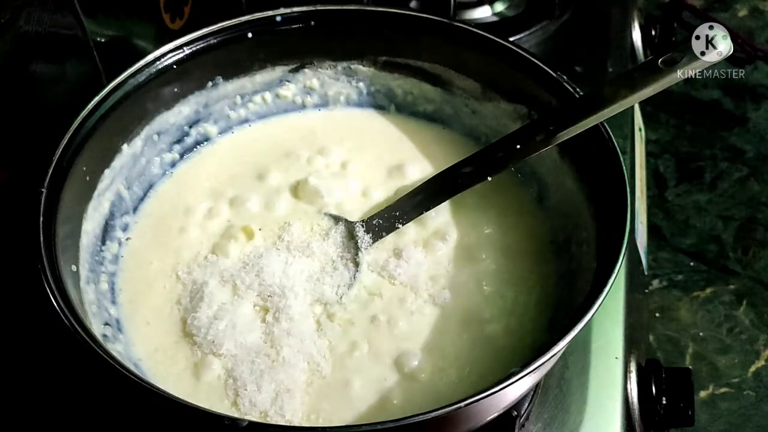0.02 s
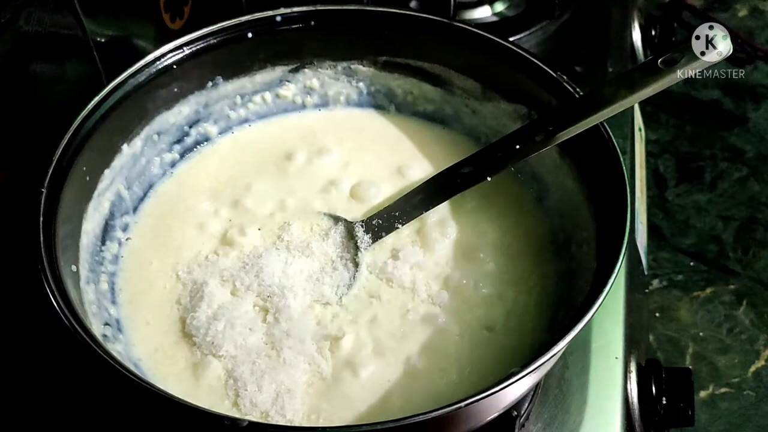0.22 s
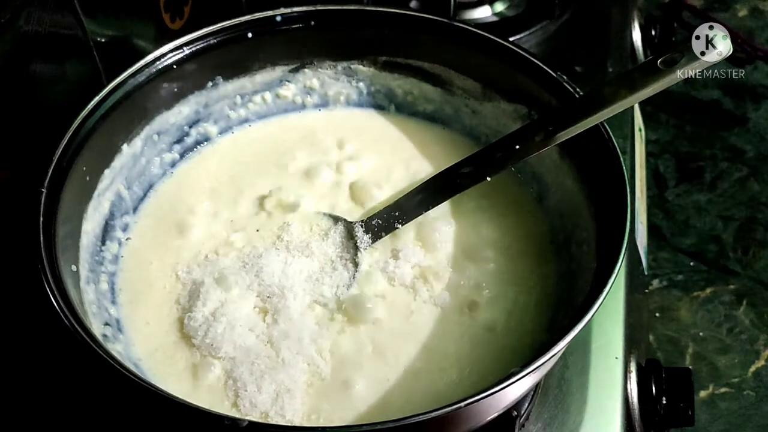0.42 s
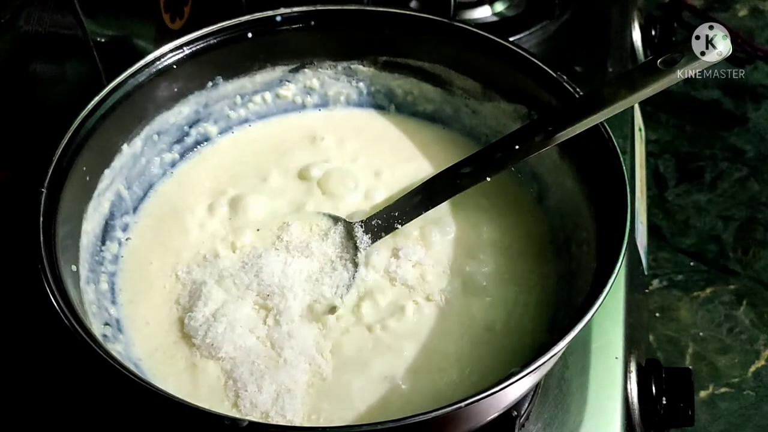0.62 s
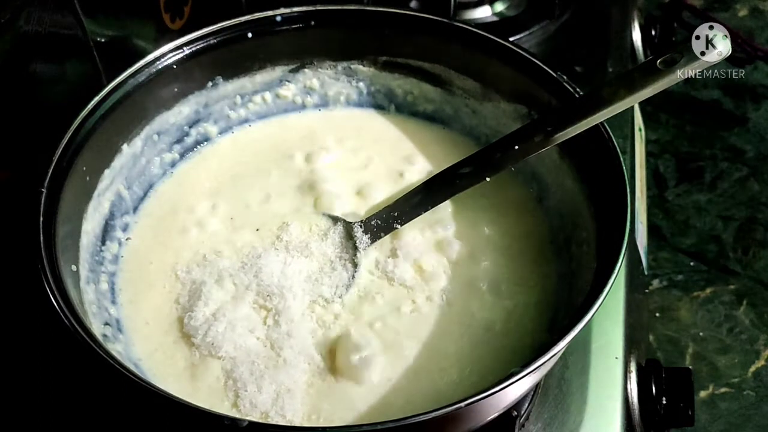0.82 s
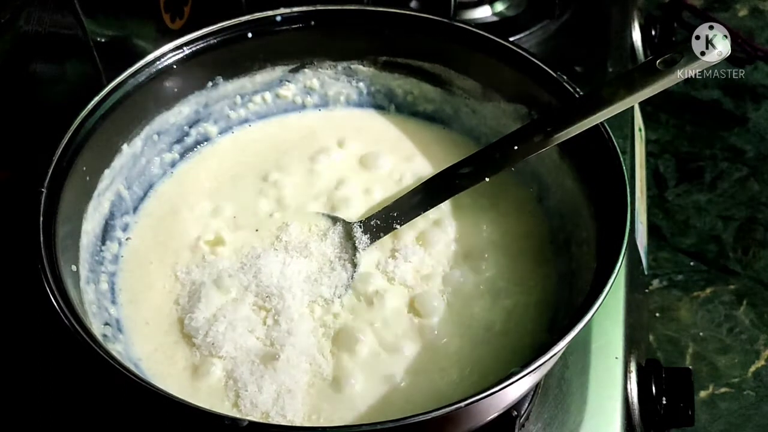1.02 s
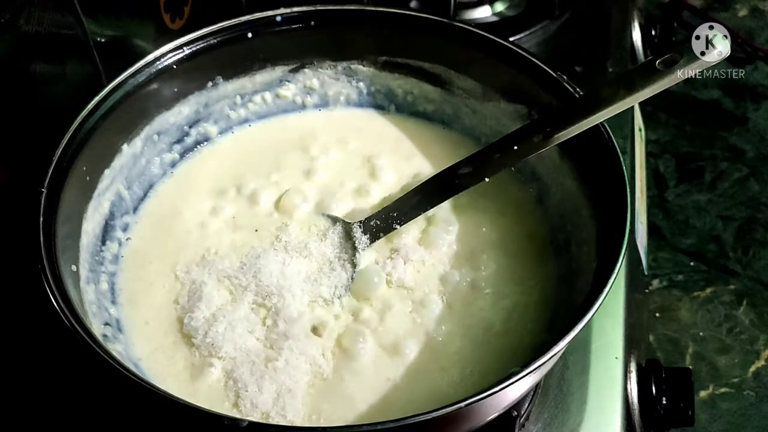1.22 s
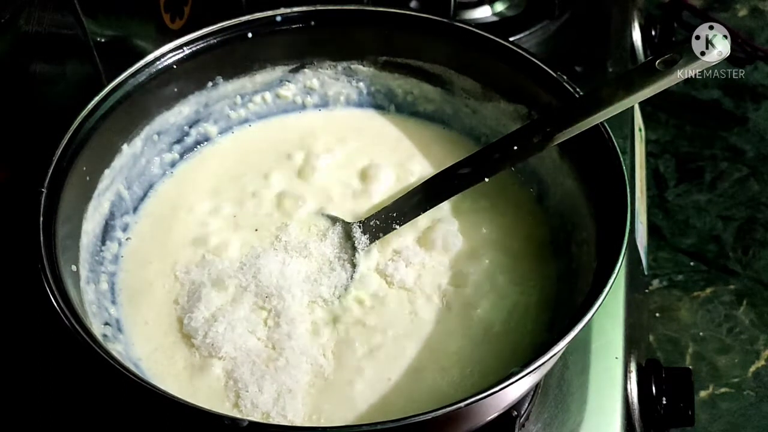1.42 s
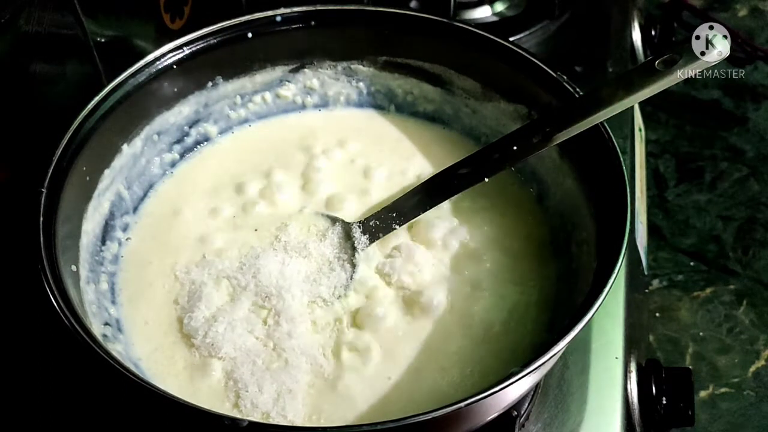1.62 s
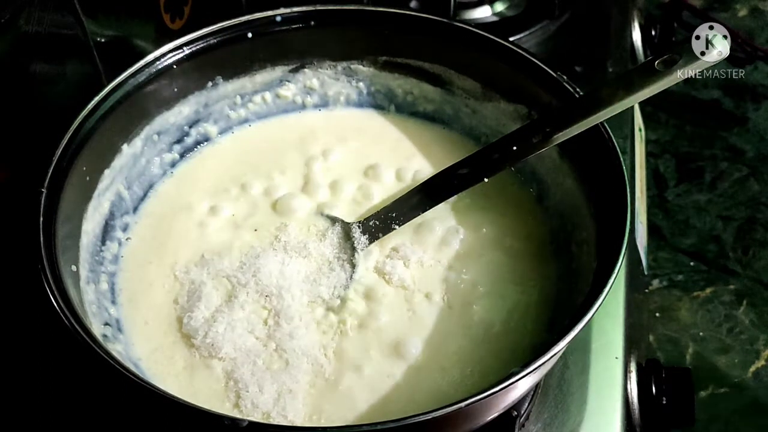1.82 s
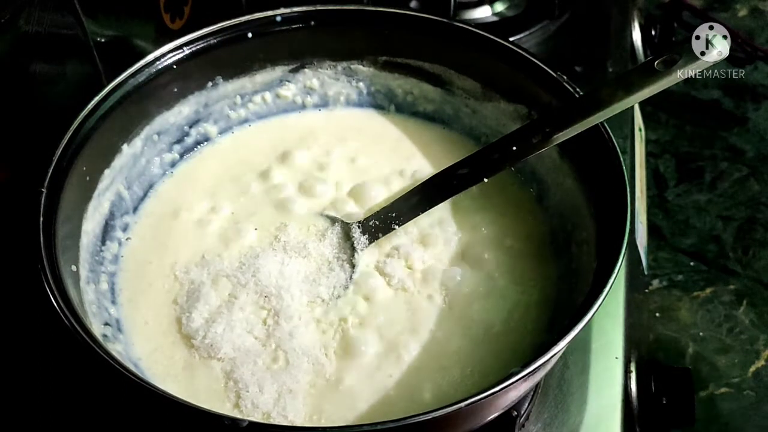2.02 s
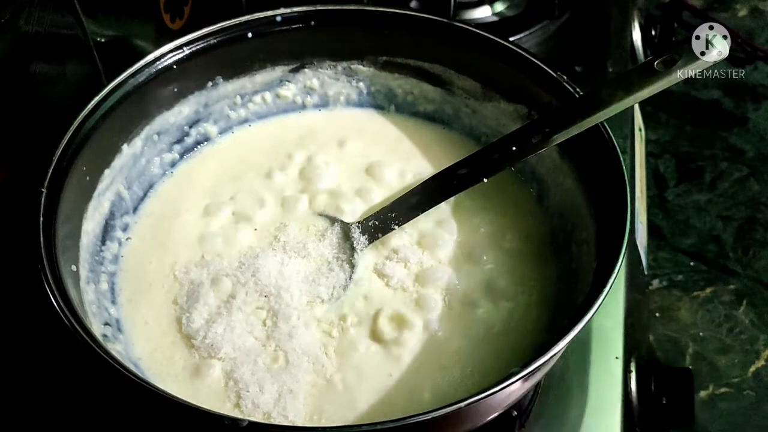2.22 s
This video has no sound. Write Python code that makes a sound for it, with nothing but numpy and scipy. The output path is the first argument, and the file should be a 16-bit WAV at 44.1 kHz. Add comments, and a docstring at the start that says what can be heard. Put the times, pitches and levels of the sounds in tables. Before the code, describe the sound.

Thick milk and grain simmering in a steel pan, bubbles popping softly, one sharp metallic tap early

```python
"""A low stove noise and a bed of small bubbles, heard close on two microphones in a hard-walled kitchen.
Thick milk and grain simmer in a steel pan: collapsing steam pockets ring its modes, bubbles pop as
short rising sines, droplets spit as noise bursts. Once something hard is tapped further off: decaying
modes with reflections, then lingering tones and a noise tail as the room answers.
Stove, burner and hiss are shaped noise; feedback delays are the kitchen around the pan."""
import sys
import numpy as np
from scipy import signal
from scipy.io import wavfile

SR = 44100
rng = np.random.default_rng(int(sys.argv[2]) if len(sys.argv) > 2 else 0)


def int16_out(signal):
    """Quantize to a 16-bit WAV file."""
    q = np.round(np.clip(np.atleast_2d(signal).T, -1, 1) * 32767)
    wavfile.write(sys.argv[1], SR, q.astype(np.int16))


N = 101429

# stove noise spectrum, relative: [f/Hz, level/dB per Hz]
STOVE_SPECTRUM = [(25, 4.5), (40, -14), (62, -15), (130, -16.5), (200, -6.5), (420, -16), (1000, -17.5),
                  (2500, -25.5), (4000, -27.5), (6000, -38.5), (8000, -28), (12000, -50.5), (14500, -28)]
# movement of the treble hiss, used about its mean: [t/s, level/dB]
HISS_LEVEL = [(0.0, -81), (0.26, -82), (0.38, -77.5), (0.66, -80.5), (1.07, -79.5), (1.77, -80.5),
              (1.94, -75.5), (2.3, -78)]
# left-right likeness of the stove noise at the microphones: [f/Hz, likeness 0-1]
STOVE_LIKENESS = [(30, 0.37), (150, 0.78), (260, 1), (500, 0.32), (2000, 0), (8000, 0.24)]
# deep rumble: [t/s, level/dB rms]
RUMBLE_LEVEL = [(0.0, -59.5), (0.09, -51.5), (0.14, -59), (0.22, -51.5), (0.47, -52), (0.5, -63),
                (0.58, -38), (0.68, -61), (0.77, -43.5), (0.88, -61), (0.91, -53.5), (1.45, -60.5),
                (2.18, -56), (2.3, -57)]
# low drones of the stove: [f/Hz, width/Hz, level/dB rms]
STOVE_DRONES = [(102.5, 13, -64), (144.6, 3.2, -71), (204.5, 14.6, -63)]
# vigour of the simmer, before the trims of bubbles and knocks: [t/s, level/dB]
SIMMER_LEVEL = [(0.0, -55.5), (0.14, -59), (0.32, -50), (0.46, -52), (0.69, -55.5), (0.99, -53),
                (1.34, -57), (2.1, -52), (2.3, -59)]
# steam pockets collapsing on the bottom: [t/s, strike level/dB, strength of the upper modes/dB]
COLLAPSES = [(0.067, -47.5, 5), (0.164, -39.5, -1), (0.27, -52, 12), (0.46, -46.5, 0), (0.556, -52, -2),
             (0.625, -58, 12.5), (0.647, -46.5, 1.5), (0.685, -48, -12.5), (0.758, -47.5, 3.5),
             (0.812, -43, -9.5), (0.875, -41, -7), (0.972, -42, -8), (1.035, -47, -4), (1.075, -45.5, 3.5),
             (1.125, -44.5, -1), (1.198, -48, 1.5), (1.313, -47, 3), (1.403, -43.5, -7),
             (1.619, -44.5, 0.5), (1.661, -58, -5), (1.769, -45, -15), (1.912, -49, -10),
             (2.028, -53.5, -9), (2.093, -46.5, -7), (2.124, -44.5, 0), (2.249, -50, -6.5)]
# modes of the full pan: [f/Hz, level/dB, t60/s]
PAN_MODES = [(207.4, -2, 0.14), (267.5, -8, 0.099), (377.6, -4.5, 0.087), (470.3, -7.5, 0.086),
             (605.3, -6, 0.12), (746, -8.5, 0.083), (830, -9.5, 0.11), (1162, -6, 0.12),
             (1320, -13.5, 0.12), (1750, -12, 0.085)]
# bubbles popping at the surface, knock and splash relative to the pop:
# [t/s, peak level/dB, starting f/Hz, knock on the pan/dB, left minus right/dB, splash/dB]
SURFACE_POPS = [(0.068, -61, 1253, -18, -4, -25), (0.1113, -44.5, 1650, -22, 5, -37),
                (0.623, -49, 1220, -4, 0, -24), (.63, -44, 453, -16, 8, -30),
                (0.629, -43.5, 1095, -7, -2, -21), (0.658, -52, 1550, -6, 10, -15),
                (0.6971, -46.5, 1620, -2, -2, -20), (0.7628, -49, 2080, 1.5, 8, -22),
                (.801, -51.5, 1750, 6, 4, -9), (0.8873, -41.5, 1176, -7, -3, -35),
                (.956, -40, 1750, -5.5, 3, -15.5), (0.9828, -47, 1900, -5, 6, -17),
                (1.04, -46, 1970, -25, 10, -15), (1.0549, -50, 1330, -7, 3, -2),
                (1.134, -36, 1320, -9, -3, -32), (1.203, -55, 1210, -9, 2, -21),
                (1.227, -47, 1880, -1.5, 0, -8), (1.277, -52.5, 3200, -17, 11, -8.5),
                (1.334, -57, 1920, -26, 12, -15), (1.3934, -53.5, 1520, 3.5, 3, -4),
                (1.443, -54, 1940, 7.5, 10.5, -1.5), (1.487, -50, 1100, -6, -7, -14),
                (1.5, -47.5, 2600, -3, 6, -17), (1.575, -57, 1750, -11, 14, -20),
                (1.6104, -48, 1930, -1, 9, -12), (1.639, -47, 1225, 0, -3, -15),
                (1.6892, -55, 1320, 2, -2, -31), (1.785, -49, 1970, -13, 12.5, -11.5),
                (1.871, -45.5, 1250, -5, 2, -19), (1.904, -51, 1710, 1, 7, -4.5),
                (1.906, -48.5, 2700, -28, 5, -9), (1.93, -48.5, 1470, 1, -2, -7.5),
                (1.956, -50, 2040, -13, 10, -8.5), (2.021, -48.5, 1440, -26, 5, -6),
                (2.065, -48, 910, 0.5, -11, -30), (2.064, -50, 1650, -13, 12, -25),
                (2.095, -41, 2280, -8, 5, -8), (2.124, -50, 1190, -9, 7, -4.5),
                (2.1561, -44, 1160, -1, -2, -26), (2.2493, -42, 1330, -12, 7, -14)]
# the tap and its first reflections: [t/s, strike level/dB, left minus right/dB]
TAP_ARRIVALS = [(0.213, -12.5, 4.5), (0.2233, -18.5, 17), (0.2286, -18, 1), (0.239, -22.5, -16),
                (0.2488, -16.5, 2), (0.262, -28, -21)]
# short body of the tapped thing: [f/Hz, level/dB, t60/s]
TAP_BODY = [(612, -16.5, 0.028), (1350, -18, 0.024), (1430, -7, 0.041), (1543, -16.5, 0.084),
            (2420, -8, 0.037), (3860, -5.5, 0.0096)]
# lingering metal tones, relative: [f/Hz, level/dB, t60/s]
METAL_TONES = [(607, -2, .3), (705, -10, .45), (1202, -4, .3), (1328, -3, .42), (1414, 0, .37),
               (1533, -1, .5), (1900, -4, .42), (2006, -1, .28), (2049, 0, .42), (2126, -5, .38),
               (2368, -5, .2), (2738, -9, .33), (3094, -7, .3), (3443, -6, .2), (3552, -5, .22),
               (4503, -24, .65), (12200, -23, 0.09)]
# colour of the room's answer to the tap, relative: [f/Hz, level/dB per Hz]
TAIL_COLOUR = [(88, -48), (175, -3), (355, -1), (429, -49), (606, -2.5), (1060, -13), (1380, 0),
               (2590, -9.5), (4260, -9.5), (4520, -27), (4870, -14), (12400, -36.5), (14500, -71)]
# decay of the room's answer: [f/Hz, t60/s]
TAIL_DECAY = [(200, 0.17), (500, 0.33), (1200, 0.62), (2500, 0.53), (5000, 0.29), (12000, 0.13)]
# left-right likeness of the room's answer at the microphones: [f/Hz, likeness 0-1]
TAIL_LIKENESS = [(150, 0.2), (600, 1), (2000, 0.1), (8000, 0.14)]
# droplets spitting, spray relative to the crack:
# [t/s, relative level/dB, centre f/Hz, left minus right/dB, spray/dB]
DROPLETS = [(0.521, -58, 5370, 0, -8), (0.5716, -48.5, 7500, 5, -13.5), (0.862, -62, 5400, 0, -10),
            (0.933, -52.5, 6560, 3, -6.5), (1.083, -49, 6740, -1, -9), (1.199, -49, 6700, 1, -23),
            (1.283, -55.5, 9400, 1, -10), (1.314, -56, 5500, 0, -19), (1.455, -53.5, 5560, 0, -5.5),
            (1.512, -60, 3900, -4, -14), (1.737, -60, 4700, 1, -11), (1.757, -60, 10600, -4, -11),
            (1.817, -46, 7400, -10, -21.5), (1.862, -60, 6000, -2, -8), (1.971, -56.5, 5920, -1, -10),
            (2.023, -63.5, 10100, -11, -2.5), (2.126, -50, 7600, 1, -11), (2.243, -55, 5800, -12, -20)]

# how much earlier the left microphone hears pan, bubbles and stove noise
LEFT_LEAD_S = 0.00013
# the same for the tap's knock, thin ring and noise tail
TAP_LEAD_S = 0.00018
STOVE_DB = -57
RUMBLE_HZ, RUMBLE_WIDTH_HZ = 20.2, 8.2
SMALL_PER_S, SMALL_DB, SMALL_CYCLES = 900, -6, 6.5   # cycles to die by 60 dB
SMALL_LOW_HZ, SMALL_HIGH_HZ, SMALL_TILT_DB = 239, 3500, 0   # tilt per octave
KNOCKS_PER_S, KNOCKS_DB = 220, -7   # small random collapses, rate per mode before clumping
GURGLE_S, GURGLE_DB = 0.016, -24.5
THUMP_SOFT_HZ, THUMP_DB, UPPER_FROM_HZ, PAN_LOW_CUT_HZ = 597, 0.5, 320, 203
KNOCK_TILT_DB = 1   # per octave: a pop rings the high modes more than the low
POP_CYCLES, POP_ATTACK_S = 17.4, 0.0011   # cycles to die by 60 dB
POP_RISE = 0.014   # fraction of the pitch gained per time constant of decay
SPLASH_LOW_HZ, SPLASH_HIGH_HZ, SPLASH_DECAY_S = 1100, 2970, 0.017
TAP_SOFT_HZ, TAP_LOW_CUT_HZ = 2700, 500
RING_HZ, RING_DB, RING_PAN_DB = 4505, -33, -12.5
RING_RISE_S, RING_T60_S, RING_STOP_S, RING_STOP_DB = 0.0062, 0.35, 0.25, -26
TONES_DB, TONES_PHASE_SPREAD = -28.5, 0.95   # radians that each microphone lies off the middle
TAIL_DB, TAIL_RISE_S = -29, 0.00069
SPIT_WIDTH_HZ, SPIT_BROAD_DB, CRACK_S = 1300, -2, 0.0018
SPRAY_S = 0.011   # half width of the spray around the crack
ROOM_DB, ROOM_T60_S, WALL_CUT_HZ = -11, 0.26, 8600
CUTOFF_HZ = 14850


def amp(db):
    """dB to gain."""
    return 10 ** (np.asarray(db) / 20)


def unit(x):
    """Scale to rms 1."""
    return x / np.sqrt(np.mean(x ** 2) + 1e-20)


def curve(rows):
    """Read a (t/s, value) table at every sample."""
    return np.interp(np.arange(N) / SR, *np.transpose(rows))


def at_hz(points, hz):
    """Read a (f/Hz, value) table on a log frequency axis."""
    table = np.array(points)
    return np.interp(np.log(hz), np.log(table[:, 0]), table[:, 1])


def drift(rate_hz):
    """Slow chance of spread 1: low-passed noise made at every 40th sample."""
    r = np.exp(-2 * np.pi * rate_hz * 40 / SR)
    noise = rng.standard_normal(N // 40 + 2002)
    slow = signal.lfilter([1], [1, -2 * r, r * r], noise)[2000:]
    return np.interp(np.arange(N) / 40, np.arange(len(slow)), unit(slow))


def band_filter(x, low_hz, high_hz):
    """Keep what lies between two frequencies."""
    return signal.sosfilt(signal.butter(2, [low_hz, high_hz], "band", fs=SR, output="sos"), x)


def low_cut(x, order, hz):
    """Remove what lies below a frequency."""
    return signal.sosfilt(signal.butter(order, hz, "high", fs=SR, output="sos"), x)


def soften(x, hz):
    """Dull a strike with two equal one-pole low-passes."""
    r = np.exp(-2 * np.pi * hz / SR)
    return signal.lfilter([(1 - r) ** 2], [1, -2 * r, r ** 2], x)


def ring(clicks, hz, t60):
    """A unit click sets a dying sine of height 1 ringing."""
    r, w = amp(-60 / (t60 * SR)), 2 * np.pi * hz / SR
    # the tiny offset keeps the filter from slowing down in silence
    return signal.lfilter([0, np.sin(w)], [1, -2 * r * np.cos(w), r * r], clicks + 1e-18)


def late(x, seconds):
    """Delay by interpolated reading."""
    return np.interp(np.arange(N) - seconds * SR, np.arange(N), x, left=0)


def sides(pan_db):
    """Gains in dB of the left and right microphones."""
    return np.array([[pan_db], [-pan_db]]) / 2


def ears(x, lead_s, pan_db=0):
    """Place a sound on two microphones: the left hears it first."""
    return np.array([x, late(x, lead_s)]) * amp(sides(pan_db))


def clicks_at(s, sizes):
    """Clicks at given times."""
    out = np.zeros(N)
    index = np.clip((np.asarray(s) * SR).astype(int), 0, N - 1)
    np.add.at(out, index, sizes)
    return out


def chance_clicks(per_s, spread_db):
    """Random clicks of uneven size and sign."""
    happens = rng.random(N) < per_s / SR
    sizes = amp(spread_db * np.minimum(rng.exponential(1, N), 4))
    return happens * sizes * rng.choice([-1, 1], N)


def puff(rows, low_hz, high_hz):
    """Short band-passed noise, rms 1."""
    return unit(band_filter(rng.standard_normal((rows, 4000)), low_hz, high_hz))


def bands(spectrum, likeness, lead_s, shape):
    """Half-octave bands of stereo noise, each with its level, likeness and envelope shape(hz)."""
    out, power = 0, 0
    edges = 22 * 2 ** np.arange(0, 9.6, .5)
    white = rng.standard_normal((2, 3, N + SR // 2))
    for k, (low, high) in enumerate(zip(edges, edges[1:])):
        # neighbouring bands take different noise; the filter's start is dropped
        both, left, right = band_filter(white[k % 2], low, high)[:, -N:]
        hz = np.sqrt(low * high)
        alike = np.clip(at_hz(likeness, hz), 0, 1)
        gain = amp(at_hz(spectrum, hz))
        stereo = np.sqrt(alike) * ears(both, lead_s) + np.sqrt(1 - alike) * np.array([left, right])
        out = out + gain * shape(hz) * stereo
        power += gain ** 2 * (high - low) * 2 / SR
    return out / np.sqrt(power)


def stove():
    """Burner roar and hiss: broad noise whose bands flicker partly together, partly alone."""
    together, fizz, hiss = drift(1.16), drift(33), curve(HISS_LEVEL)
    hiss = hiss - hiss.mean()

    def flicker(hz):
        roar_db = (1.9 * together + 2.55 * drift(10.2)) * (.45 if hz > 2000 else 1)
        fizz_db = 1.6 * fizz * (hz > 2000)
        hiss_db = hiss * np.clip(np.log2(hz / 2500), 0, 1)
        return amp(roar_db + fizz_db + hiss_db)

    return amp(STOVE_DB) * bands(STOVE_SPECTRUM, STOVE_LIKENESS, LEFT_LEAD_S, flicker)


def drones():
    """Deep rumble and low drones: noise twice through narrow resonances."""
    voices = [(RUMBLE_HZ, RUMBLE_WIDTH_HZ, amp(curve(RUMBLE_LEVEL)))]
    voices += [(hz, width, amp(db)) for hz, width, db in STOVE_DRONES]
    out = 0
    for hz, width, gain in voices:
        t60 = 2.2 / width
        noise = rng.standard_normal((3, N + SR))
        both, left, right = ring(ring(noise, hz, t60), hz, t60)[:, -N:]
        out = out + gain * unit(both + 0.32 * np.array([left, right]))
    return out


def small_bubbles(vigour):
    """A rain of small bubbles: random clicks dealt out to twenty short resonances."""
    clicks = chance_clicks(SMALL_PER_S * amp(3.6 * drift(12)), spread_db=5.0)
    dealt = rng.integers(0, 20, N)
    rings = 0
    for k, hz in enumerate(np.geomspace(SMALL_LOW_HZ, SMALL_HIGH_HZ, 20)):
        tilt = amp(SMALL_TILT_DB * np.log2(hz / 1000))
        rings = rings + tilt * ring(clicks * (dealt == k), hz, SMALL_CYCLES / hz)
    return amp(SMALL_DB) * vigour * unit(rings)


def pan(vigour):
    """Soft collapses with their gurgle, pops and clumps of small knocks all ring the pan's modes."""
    fade = np.exp(-1 / (GURGLE_S * SR))
    collapses, bubbles = np.array(COLLAPSES), np.array(SURFACE_POPS)
    luck = rng.normal(0, 2, (len(collapses), len(PAN_MODES)))   # dB per collapse and mode
    clumps = KNOCKS_PER_S * amp(5 * drift(5.9))
    pop_knock = clicks_at(bubbles[:, 0], amp(bubbles[:, 1] + bubbles[:, 3]))
    hits, hum = 0, 0
    for k, (hz, level_db, t60) in enumerate(PAN_MODES):
        upper_db = collapses[:, 2] * (hz > UPPER_FROM_HZ)
        strike = clicks_at(collapses[:, 0], amp(collapses[:, 1] + THUMP_DB + luck[:, k] + upper_db))
        # a short fading noise after each collapse
        gurgle = signal.lfilter([1], [1, -fade], strike + 1e-18) * rng.standard_normal(N)
        thump = soften(strike + amp(GURGLE_DB) * gurgle, THUMP_SOFT_HZ)
        knock = amp(KNOCK_TILT_DB * np.log2(hz / 1000)) * pop_knock
        hits = hits + amp(level_db) * ring(thump + knock, hz, t60)
        small_knocks = chance_clicks(clumps * amp(4.9 * drift(4.5)), spread_db=4.5)
        hum = hum + amp(level_db) * ring(small_knocks, hz, t60)
    return low_cut(hits + amp(KNOCKS_DB) * vigour * unit(hum), 3, PAN_LOW_CUT_HZ)


def pops():
    """Each bubble is a short sine that rises in pitch as it dies, with a small splash."""
    out, t = np.zeros((2, N + 4000)), np.arange(4000) / SR
    onset = 1 - np.exp(-t / POP_ATTACK_S)
    splashes = puff(len(SURFACE_POPS), SPLASH_LOW_HZ, SPLASH_HIGH_HZ)
    for (s, db, hz, _, pan_db, splash_db), noise in zip(SURFACE_POPS, splashes):
        fade = np.log(1000) * hz / POP_CYCLES
        phase = 2 * np.pi * hz * (t + POP_RISE * fade * t ** 2 / 2)
        tone = np.sin(phase) * np.exp(-fade * t) * onset
        splash = amp(splash_db) * noise * np.exp(-t / SPLASH_DECAY_S) * onset
        i = int(s * SR)
        out[:, i:i + 4000] += amp(db + sides(pan_db)) * (tone / np.abs(tone).max() + splash)
    return np.array([out[0, :N], late(out[1, :N], LEFT_LEAD_S)])


def tap_knock():
    """The direct tap and its reflections: softened clicks ring the short body modes."""
    out = 0
    for s, db, pan_db in TAP_ARRIVALS:
        luck = rng.normal(0, 0.82, len(TAP_BODY))   # dB per mode
        body = 0
        for (hz, mode_db, t60), luck_db in zip(TAP_BODY, luck):
            strike = soften(clicks_at([s], amp(db + mode_db + luck_db)), TAP_SOFT_HZ)
            body = body + ring(strike, hz, t60)
        out = out + ears(body, TAP_LEAD_S, pan_db)
    return low_cut(out, 2, TAP_LOW_CUT_HZ)


def thin_ring(since):
    """One high sine swells, decays and is damped part way."""
    damped_db = RING_STOP_DB * np.clip((np.arange(N) / SR - RING_STOP_S) / 0.011, 0, 1)
    level = amp(RING_DB + damped_db - 60 * since / RING_T60_S)
    thin = level * (1 - np.exp(-since / RING_RISE_S)) * np.sin(2 * np.pi * RING_HZ * since)
    return ears(thin, TAP_LEAD_S, RING_PAN_DB)


def metal_tones(since):
    """Lingering decaying sines, each out of phase between the microphones."""
    out = 0
    for hz, db, t60 in METAL_TONES:
        start = rng.uniform(0, 2 * np.pi)
        offset = TONES_PHASE_SPREAD * rng.choice([-1, 1]) * np.array([[1], [-1]])
        tone = np.sin(2 * np.pi * hz * since + start + offset)
        out = out + amp(TONES_DB + db - 60 * since / t60) * tone
    return out


def tap():
    """A knock further off with reflections, a thin damped ring, metal tones and the room's noise tail."""
    since = np.maximum(np.arange(N) / SR - TAP_ARRIVALS[0][0], 0)
    rise = 1 - np.exp(-since / TAIL_RISE_S)

    def decay(hz):
        return rise * amp(-60 * since / at_hz(TAIL_DECAY, hz))

    struck = tap_knock() + thin_ring(since) + metal_tones(since) * rise
    tail = bands(TAIL_COLOUR, TAIL_LIKENESS, TAP_LEAD_S, decay)
    return struck + amp(TAIL_DB) * tail


def spits():
    """Each spit is a sharp bright noise crack inside a softer spray."""
    out, t = np.zeros((2, N + 4000)), np.arange(-1500, 2500) / SR
    for s, db, hz, pan_db, spray_db in DROPLETS:
        narrow = puff(2, hz - SPIT_WIDTH_HZ / 2, hz + SPIT_WIDTH_HZ / 2)
        noise = narrow + amp(SPIT_BROAD_DB) * puff(2, 1900, 11600)
        crack = (t > 0) * np.exp(-np.maximum(t, 0) / CRACK_S)
        spray = amp(spray_db) * np.exp(-.5 * (t / SPRAY_S) ** 2)
        i = int(s * SR) - 1500   # the spray starts ahead of the crack
        out[:, i:i + 4000] += amp(db - 6 + sides(pan_db)) * noise * (crack + spray)
    return out[:, :N]


def kitchen(x):
    """Hard walls: six feedback delays a side, duller on every round."""
    out, dull = np.zeros((2, N)), np.exp(-2 * np.pi * WALL_CUT_HZ / SR)
    lags = (rng.uniform(.012, .04, 12) * SR).astype(int)
    for k, lag in enumerate(lags):
        loop, state = x.copy(), [0.]
        gain = amp(-60 * lag / SR / ROOM_T60_S)
        for i in range(lag, N, lag):
            back, state = signal.lfilter([gain * (1 - dull)], [1, -dull], loop[i - lag:i], zi=state)
            loop[i:i + lag] += back[:N - i]
        out[k % 2] += (loop - x) * (-1) ** (k // 2)
    return out


def scene():
    """Pan and bubbles with the kitchen around them, spits, the tap further off, the stove below."""
    vigour = amp(curve(SIMMER_LEVEL))
    milk = ears(pan(vigour) + small_bubbles(vigour), LEFT_LEAD_S, pan_db=2.5) + pops()
    room = amp(ROOM_DB) * kitchen(milk.mean(axis=0))
    return milk + room + spits() + tap() + stove() + drones()


def record(dry):
    """The top is cut steeply, by 60 dB from the cutoff up."""
    return signal.sosfilt(signal.cheby2(14, 60, CUTOFF_HZ, fs=SR, output="sos"), dry)


dry = scene()
out = record(dry)
int16_out(out)
```